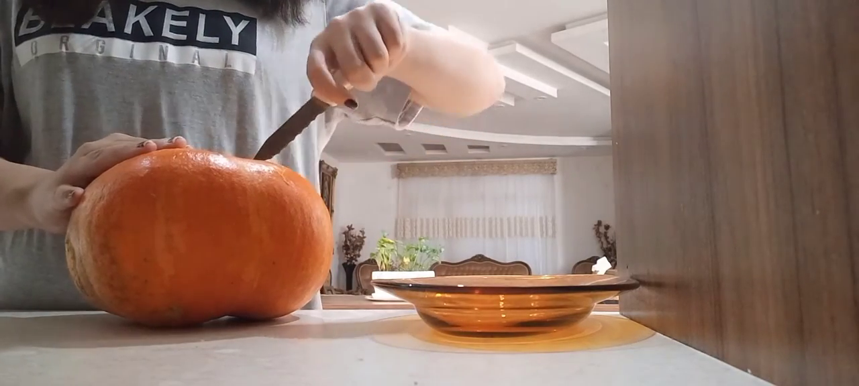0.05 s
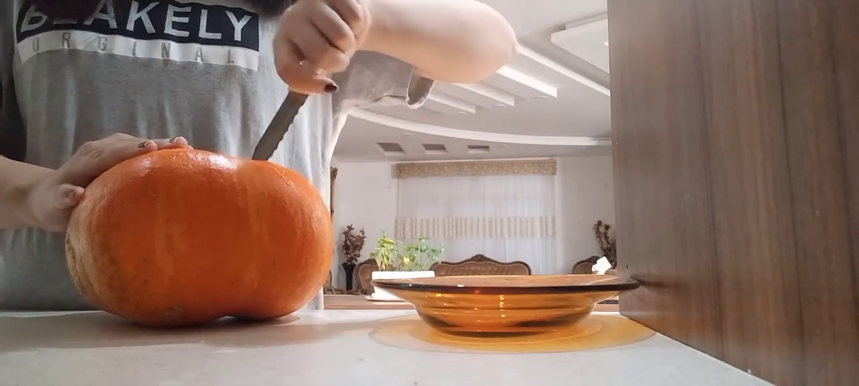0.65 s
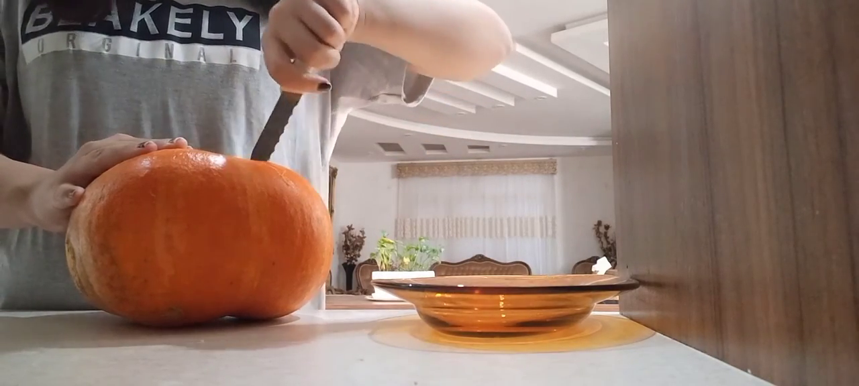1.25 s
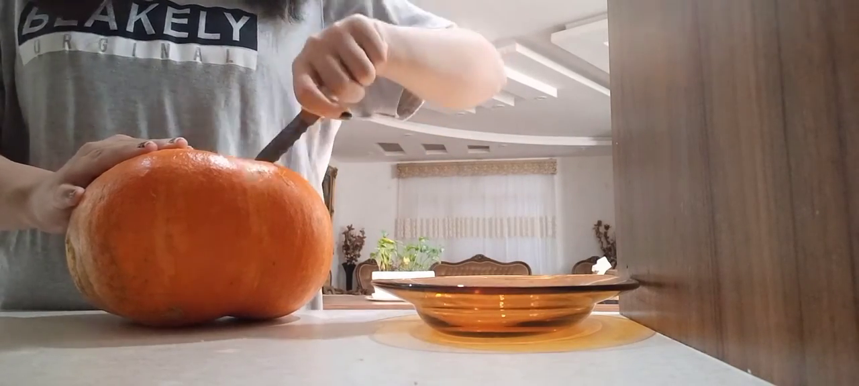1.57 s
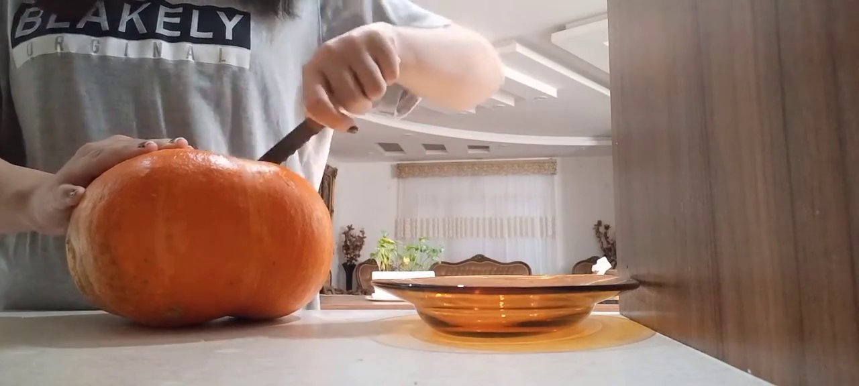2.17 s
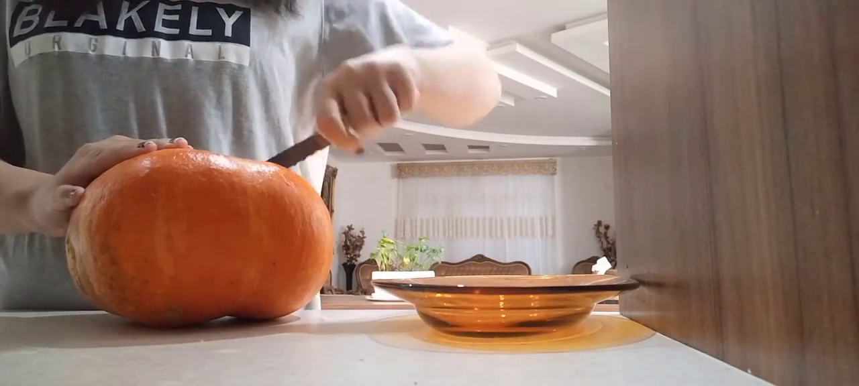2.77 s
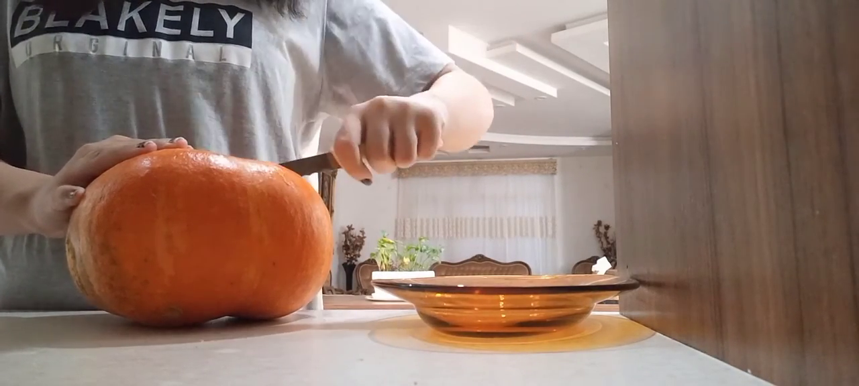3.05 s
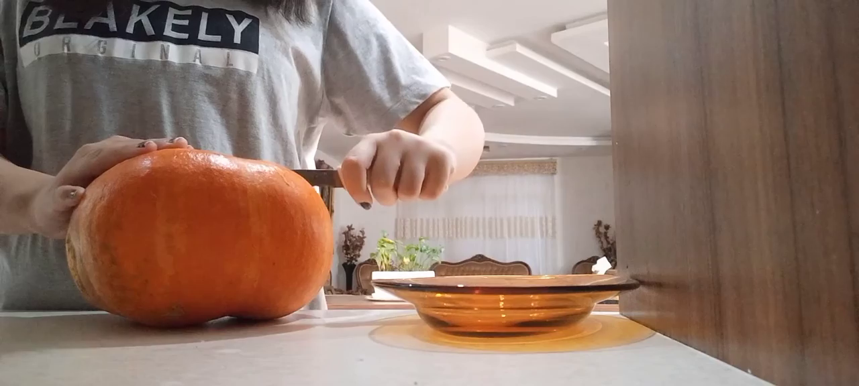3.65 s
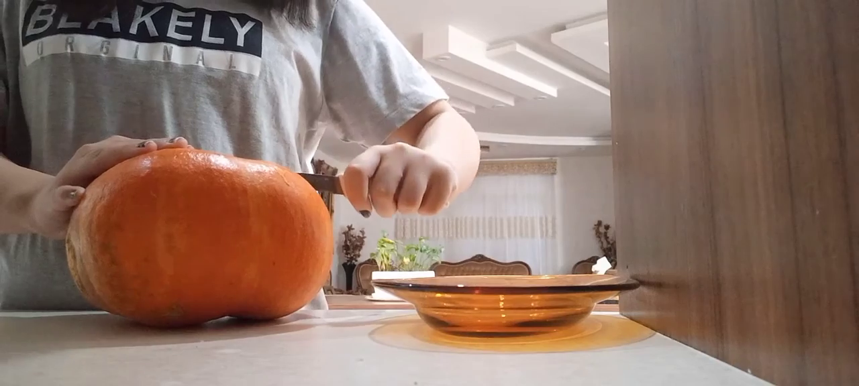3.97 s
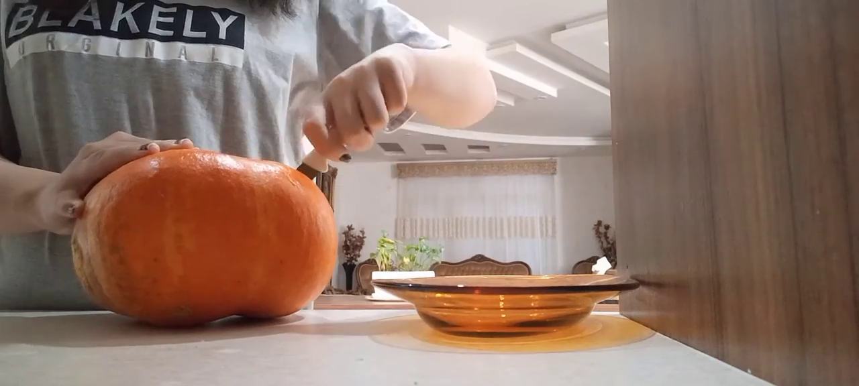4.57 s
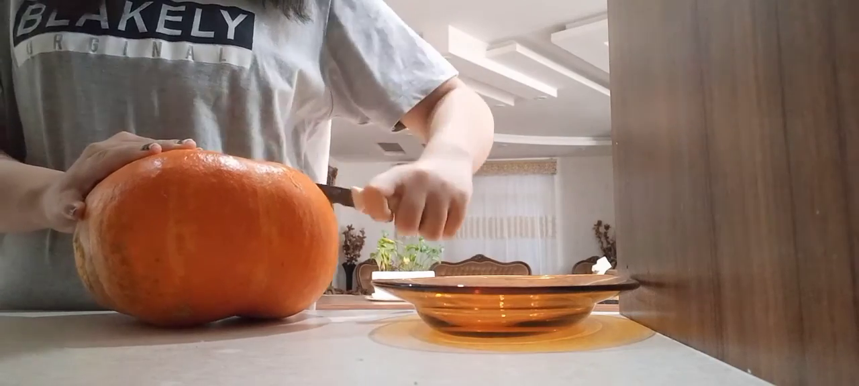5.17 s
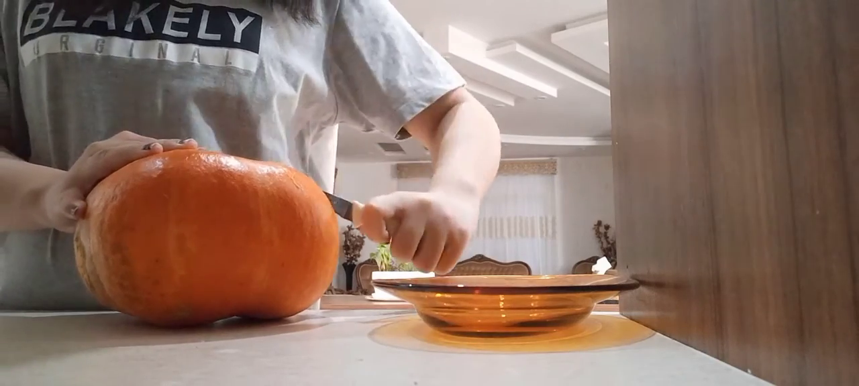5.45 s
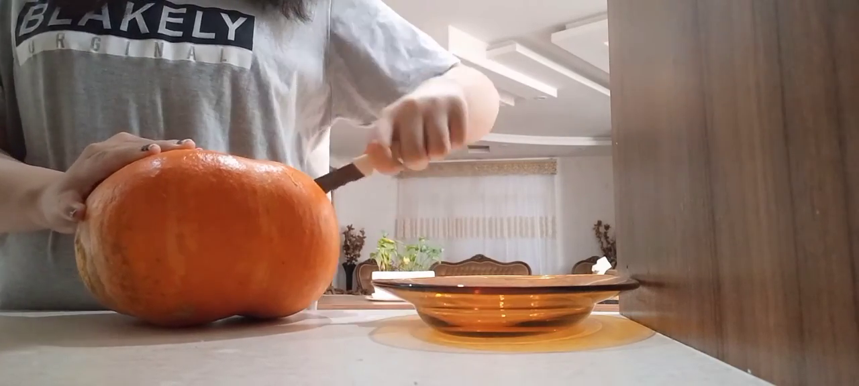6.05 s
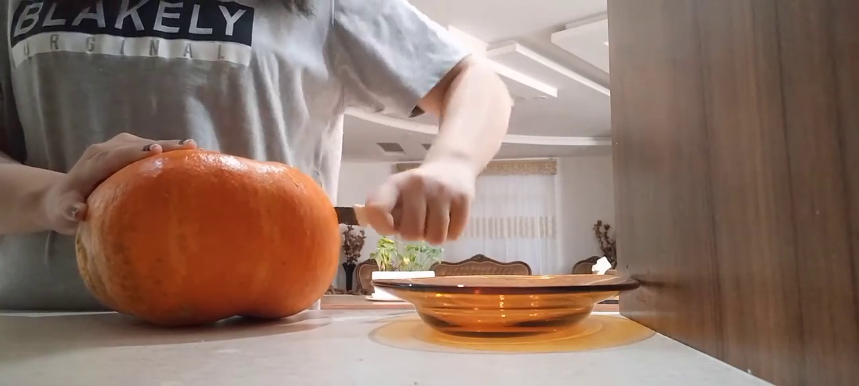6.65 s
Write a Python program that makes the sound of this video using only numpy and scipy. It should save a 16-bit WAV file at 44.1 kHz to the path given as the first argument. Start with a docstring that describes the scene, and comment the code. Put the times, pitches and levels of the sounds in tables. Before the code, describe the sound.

A kitchen knife saws through a raw pumpkin, close and slightly left, in a small, quiet kitchen. From the start, short uneven strokes make the rind croak and crunch, with a thin hiss from the blade and single fibres snapping. Firmer strokes come at about 1.5, 2.1 and 2.8 to 3 seconds, and the wet rind gives one faint, low squeak near 1.9. From 3.2 to 4.1 seconds the fibres part in a run of crisp little clicks. After a softer push, all sound drops out for an instant at 4.5. At 5.1 to 5.4 the blade levers along the cut with the loudest creak and a hollow boom, and the pumpkin rocks on the counter at 5.6. Another crunching, thumping push comes around 6.5, followed by lighter snaps until nearly 7 seconds. A soft rumble and a faint, very high whine lie underneath.

```python
"""A kitchen knife saws through a raw pumpkin on a counter in a small, quiet kitchen. Tearing fibres make the
rind croak near 500 Hz and the thin blade hiss near 6.4 kHz; single fibres snap. When the blade is levered along
the cut, the hollow pumpkin booms and rocks. Wet rind squeaks faintly. A soft rumble and a thin whine lie
underneath, and the whole sound drops out for a moment."""
import sys
import numpy as np
from scipy import signal
from scipy.fft import rfft, irfft
from scipy.io import wavfile
from scipy.ndimage import uniform_filter1d

SR = 44100
rng = np.random.default_rng(int(sys.argv[2]) if len(sys.argv) > 2 else 0)


def dump_mix(stems):
    """Bounce the given channels to the path in sys.argv[1] as a 16-bit WAV at rate SR."""
    frames = np.atleast_2d(stems).T  # one column per channel
    limited = np.clip(frames, -1, 1)  # hard clip at full scale
    pcm = np.round(limited * 32767).astype(np.int16)
    wavfile.write(sys.argv[1], SR, pcm)


N = 305158
TIME = np.arange(N) / SR
RELEASE_S, FIRM_DB = 0.067, -59.5  # fade time of a stroke; level that counts as a firm stroke


def from_db(db):
    """Turn decibels into a gain."""
    return 10 ** (np.asarray(db) / 20)


def rms_one(x):
    """Scale a signal to an average strength (rms) of 1."""
    return x / np.sqrt(np.mean(x ** 2) + 1e-20)


def gain_curve(points):
    """Join (time, dB) points into a gain for every sample."""
    return from_db(np.interp(TIME, *np.transpose(points)))


def drift(rate_hz):
    """A smooth random wander with a spread of about 1."""
    r = np.exp(-40 * np.pi * rate_hz / SR)
    slow = signal.lfilter([1], [1, -2 * r, r * r], rng.standard_normal(N // 20 + 2002))[2000:]
    return np.interp(np.arange(N) / 20, np.arange(len(slow)), rms_one(slow))


def resonate(force, modes, low_hz, high_hz, order=2):
    """A force makes a body ring at its own pitches (modes), in stereo, within a frequency band."""
    click, ring = signal.unit_impulse(SR // 8), 0
    for k, (hz, width, db, pan) in enumerate(modes):
        r = np.exp(-np.pi * width / SR)
        feedback = [1, -2 * r * np.cos(2 * np.pi * hz / SR), r * r]
        mode = signal.lfilter([1, 0, -1], feedback, click) * (1 - r * r) / 2
        ring = ring + (-1) ** k * from_db([[db + pan / 2], [db - pan / 2]]) * mode
    band = signal.butter(order, [low_hz, high_hz], "band", fs=SR, output="sos")
    ring = signal.sosfilt(band, ring + 1e-18)
    ring /= np.sqrt(np.sum(ring ** 2) / 2)
    return signal.oaconvolve(np.atleast_2d(force), ring, axes=1)[:, :N]


def knife_strokes():
    """Strength of croak, crunch and hiss: each stroke swells, holds and dies away."""
    # strokes: (time at full force [s], hold [s], rise [s], rind croak [dB], flesh crunch [dB], hiss [dB])
    strokes = [(0.225, 0.18, 0.027, -57.5, -77, -81), (0.452, 0.08, 0.085, -51, -71.5, -80.5),
               (0.595, 0.056, 0.072, -54, -69, -82.5), (0.94, 0.019, 0.071, -52, -65.5, -74),
               (1.026, 0.013, .04, -63.5, -78, -85.5), (1.153, 0.05, 0.096, -59.5, -74, -81),
               (1.281, 0.035, 0.089, -69, -83.5, -85), (1.458, 0.042, .08, -45, -58, -66.5),
               (1.767, .17, 0.27, -67, -78.5, -80), (2.108, 0.057, 0.11, -49, -58.5, -66.5),
               (2.393, 0.1, 0.057, -66.5, -82.5, -76), (2.766, 0.11, 0.14, -47.5, -59, -66.5),
               (2.897, 0.069, 0.069, -48, -57, -59.5), (2.974, 0.022, .04, -46.5, -56, -57),
               (3.24, 0.027, 0.055, -56.5, -74.5, -66), (3.32, 0.2, 0.052, -63, -76, -78.5),
               (3.54, 0.096, 0.065, -59.5, -68.5, -65.5), (3.707, 0.0096, 0.063, -55.5, -69.5, -67),
               (3.812, 0.033, 0.014, -53.5, -65.5, -67), (3.877, 0.23, .02, -63, -78, -76.5),
               (4.383, 0.12, 0.096, -62, -73.5, -74.5), (4.643, 0.049, 0.04, -71, -95, -100),
               (4.765, 0.023, 0.056, -75, -67.5, -93), (5.138, 0.04, 0.057, -46, -59, -62.5),
               (5.217, 0.11, 0.035, -52, -63, -68), (5.325, 0.029, 0.094, -38, -52.5, -61.5),
               (5.62, 0.027, 0.013, -54, -66.5, -66), (5.702, 0.14, .05, -80, -86.5, -87),
               (6.052, 0.07, 0.11, -67.5, -80, -93), (6.359, .015, .01, -56.5, -76.5, -77),
               (6.483, 0.014, 0.034, -40, -45, -53.5), (6.59, 0.1, 0.023, -56, -69.5, -71.5),
               (6.816, 0.11, 0.14, -60.5, -78, -79.5)]
    creep_db, creep_end_s, ramp_db = [[-79.5], [-88], [-98.5]], 4.25, 20.5
    force = from_db(creep_db) * np.clip((creep_end_s - TIME) / RELEASE_S, 0, 1)  # creep between strokes
    for s, hold, rise, *levels_db in strokes:
        away = np.maximum((s - TIME) / rise, (TIME - s - hold) / RELEASE_S)
        on = away < 4
        swell = from_db(-ramp_db * np.maximum(away[on], 0))
        force[:, on] = np.maximum(force[:, on], from_db(levels_db)[:, None] * swell)
    return force


def cell_bursts(per_s, spread_db, friction, stereo):
    """Tiny cell walls burst at random over smooth friction, each with its own strength at each ear."""
    sizes = from_db(spread_db * np.minimum(rng.exponential(1, N), 4))
    sizes *= rng.random(N) < per_s / SR
    ears = rng.choice([-1, 1], N) + stereo * rng.standard_normal((2, N))
    return rms_one(ears * (rms_one(sizes) + friction))


def cutting():
    """Fibres give way in clumps and shake pumpkin and knife; returns the low and the high sounds."""
    # how each part rings, all as (pitch [Hz], width [Hz], relative level [dB], left minus right [dB])
    hollow_modes = [(75.5, 35, -3, -1.5), (96, 36.6, -0.5, -1), (160, 22, -5, -1), (196.6, 22, -8.5, -0.5),
                    (262.7, 20, -9.5, -0.5)]
    rind_modes = [(313, 33, -11, -6), (441.3, 58.4, -0.5, -3), (500.2, 46.5, 1.5, -3.5), (554, 60, -6, -1),
                  (606, 77, -10, -3)]
    flesh_modes = [(699, 79, 2.5, 7.5), (869, 140, -1, -1), (1025, 82, 0, 4), (1370, 60, -10, -6),
                   (1596, 119, -12.5, -13)]
    top_modes = [(593, 80, 3.5, 1.5), (862, 150, -1, 2), (1042, 85, 1.5, 3.5)]  # the pumpkin's top wall
    knife_modes = [(1343, 40, 8.5, -8.5), (1630, 150, -5.5, 0), (3250, 330, -16, -4), (3650, 730, -5, 4),
                   (4635, 310, 1, -3)]  # the whole knife bending
    blade_modes = [(6030, 580, -4, -6.5), (6470, 590, 2, 5.5), (6790, 380, -5, -7.5)]
    fibre_modes = [(3146, 430, -2, -11.5), (4585, 600, 4, 6.5), (5580, 665, 5.5, -5), (6985, 640, 0, 3.5),
                   (9970, 2140, -1.5, -1), (12550, 1460, 3, 3.5), (14930, 2430, 1, 5)]
    croak, crunch, hiss = knife_strokes()
    tearing = from_db(-62) * (np.sqrt(crunch * hiss) / from_db(FIRM_DB)) ** 1.36  # wet; needs force
    clumps = drift(50)
    coarse = rms_one(from_db(1.72 * clumps)) * cell_bursts(1400, spread_db=2, friction=0.31, stereo=0.31)
    medium = rms_one(from_db(5.7 * clumps)) * cell_bursts(1500, spread_db=2.5, friction=0.4, stereo=0.69)
    fine = rms_one(from_db(3.3 * clumps)) * cell_bursts(4000, spread_db=2, friction=0.36, stereo=1)
    crack, knock = fibre_snaps(croak, hiss)
    hollow = resonate(croak * coarse * from_db(-7.5), hollow_modes, 60, 360)
    rind = resonate(croak * coarse * from_db(-0.5) + knock * from_db(13.5), rind_modes, 250, 800)
    flesh_force = crunch * medium * from_db(-1.47) + knock * from_db(-2.5)
    flesh = resonate(flesh_force, flesh_modes, 600, 1745, order=3)
    knife = resonate(crack * from_db(-4), knife_modes, 1500, 5500)
    blade = resonate(hiss * fine * from_db(-2.5) + crack * from_db(10), blade_modes, 5270, 7400)
    fibres = resonate(tearing * fine + crack * from_db(2), fibre_modes, 1200, 18000)
    # until 3.15 s the knife stands steeply: the top wall rings too and the rubbing blade sings
    steep = np.clip((3.15 - TIME) / RELEASE_S, 0, 1)
    top_force = steep * crunch * cell_bursts(2000, spread_db=1.5, friction=0.5, stereo=0.82)
    top = resonate(top_force, top_modes, 500, 1180, order=3)
    rubbing = steep * from_db(-64.5) * (hiss / from_db(FIRM_DB)) ** 0.71 * rng.standard_normal((2, N))
    singing = resonate(rubbing, [(6390, 210, 0, 1.1)], 5800, 7100)
    return hollow + rind, top + flesh + knife + blade + fibres + singing


def room_tone(alike_below_hz=600):
    """The still room rumbles softly, alike at both ears in the bass, with a thin high whine."""
    # tone colour of the air: (frequency [Hz], relative level [dB])
    air_colour = [(20, -34.5), (32, -17.5), (45, -8), (80, -1.5), (105, -3), (160, -8.5), (300, -12),
                  (480, -22), (680, -26), (1100, -37), (2000, -38.5), (4000, -43), (8000, -48.5),
                  (15000, -39.5)]
    # loudness of the air and of the whine: (time [s], level [dB])
    air_level = [(0, -64.5), (4.2, -64), (4.47, -59), (4.54, -67), (6.0, -68), (6.92, -65.5)]
    whine_level = [(0, -75), (4.47, -76.5), (4.54, -79), (6.2, -83.5), (6.92, -73)]
    # the whine: (pitch [Hz], width [Hz], relative level [dB], left minus right [dB])
    whine_modes = [(15272, 35, 0, 9), (15150, 380, -22, 9)]
    hz = np.maximum(np.arange(N // 2 + 1) * SR / N, 1)
    air_hz, air_db = np.transpose(air_colour)
    colour = from_db(np.interp(np.log(hz), np.log(air_hz), air_db))
    alike = 0.9 / (1 + (hz / alike_below_hz) ** 2)
    mid, side = rfft(rng.standard_normal((2, N)))
    ears = np.sqrt(1 + alike) * mid + np.sqrt(1 - alike) * side * [[1], [-1]]
    air = rms_one(irfft(colour * ears, N))
    whine = resonate(rng.standard_normal(N), whine_modes, 13000, 15700)
    return gain_curve(air_level) * air + gain_curve(whine_level) * whine


def fibre_snaps(croak, hiss, crumble_s=0.0024, crumble=0.22):
    """A snapping fibre knocks the rind and jolts the blade with a click, then crumbles briefly."""
    # thick fibres snapping: (time [s], crack force [dB], knock force [dB])
    thick_snaps = [(0.2175, -56, -50), (0.2746, -66, -51), (0.384, -60, -48), (0.9057, -56.5, -50),
                   (0.9413, -48.5, -39), (1.4457, -48, -45), (1.8997, -52.5, -41.5), (2.1273, -46, -50),
                   (2.15, -48, -61), (2.7908, -47.5, -49), (2.815, -44, -34.5), (2.8717, -45, -48),
                   (3.263, -51, -47.5), (3.3284, -53, -53), (3.4004, -47.5, -51), (3.5118, -47, -53),
                   (3.5523, -43.5, -46), (3.6075, -42.5, -66), (3.635, -46, -63), (3.691, -53, -63),
                   (3.707, -46, -60), (3.7795, -52.5, -53), (3.8072, -40.5, -36), (3.8392, -48.5, -61),
                   (3.8926, -40, -39), (3.9215, -51.5, -51), (3.9569, -49, -59), (4.0822, -49.5, -69),
                   (4.0996, -47.5, -38.5), (4.3124, -82, -48), (5.1337, -45.5, -56), (5.1848, -45.5, -49),
                   (5.2784, -68, -25.5), (5.3238, -45.5, -16.5), (6.356, -57.5, -45.5), (6.473, -45, -39),
                   (6.4864, -48, -42), (6.5901, -42, -41.5), (6.6348, -46.5, -37), (6.6893, -53, -40),
                   (6.8607, -51.5, -41.5)]
    thin_per_s, parted_per_s, spread_db = 8, 30, 1.5
    sizes = from_db(spread_db * rng.standard_normal(N))
    thin = sizes * (rng.random(N) < thin_per_s / SR)
    held_flat = (TIME > 3.3) & (TIME < 4.18)  # the flat blade parts fibres one by one
    parted = sizes * (rng.random(N) < parted_per_s / SR) * held_flat
    crack = thin * hiss * from_db(5.5) + parted * from_db(-56.5)
    knock = (thin + parted) * croak * from_db(-1.5)
    for s, crack_db, knock_db in thick_snaps:
        crack[int(s * SR)], knock[int(s * SR)] = from_db(crack_db), from_db(knock_db)
    fading = signal.lfilter([1], [1, -np.exp(-1 / (crumble_s * SR))], crack + 1e-18)
    return crack + crumble * fading * rng.standard_normal((2, N)), knock


def blade_shoves(wobble=0.5):
    """The stuck blade pushes unevenly: rocking, hollow boom and rind tone build up, then ring out."""
    # pushes: (end [s], length [s], rocking [dB], boom [dB], rind pitch [Hz], rind [dB]); relative levels
    pushes = [(0.299, 0.021, -55, -58, 481.6, -43), (0.367, 0.067, -45, -55, 269, -52.5),
              (0.545, 0.041, -51, -51.5, 482, -41.5), (1.491, 0.065, -44, -44, 496.8, -41.5),
              (1.523, 0.0085, -36.5, -46, 465, -57), (2.992, 0.039, -45.5, -82, 533, -41),
              (3.27, 0.059, -68, -65.5, 320, -54), (4.412, 0.033, -41.5, -54, 510, -69),
              (5.149, .021, -46.5, -53.5, 525, -33.5), (5.269, 0.078, -61, -44, 490, -48),
              (5.332, 0.018, -48, -41.5, 498.1, -22), (5.365, 0.11, -53, -26, 480, -40),
              (5.647, 0.037, -32, -42, 267, -56.5), (6.075, 0.034, -49, -43, 378, -69),
              (6.382, 0.025, -34.5, -43, 480, -50), (6.464, 0.013, -55, -52, 490, -40.5),
              (6.501, 0.023, -35.5, -33, 467.2, -33), (6.545, 0.047, -38, -37, 490, -54),
              (6.648, 0.022, -43, -47, 506, -42)]
    # the rocking slows once the knife levers at the side: (time [s], pitch [Hz])
    rocking_pitch = [(0, 91.2), (4.4, 89), (5.35, 74.6), (6.6, 66.1)]
    sound, t = np.zeros((2, N + SR)), TIME[:SR // 2]
    uneven = wobble * drift(25)[:len(t)]
    for end, length, rock_db, boom_db, rind_hz, rind_db in pushes:
        start = int((end - length) * SR)
        rock_hz = np.interp(end, *np.transpose(rocking_pitch))
        push = np.sin(np.pi * np.minimum(t / length, 1) ** 2)
        # the rocking comes through the counter and reaches the right ear later
        tones = [(rock_hz, rock_db, 0.1, 0.0014), (154, boom_db, 0.21, 0), (rind_hz, rind_db, 0.062, 0)]
        for hz, db, ring_s, lag_s in tones:
            swell = signal.lfilter([1], [1, -from_db(-60 / (ring_s * SR))], push)
            clock = t + start / SR - [[0], [lag_s]]  # overlapping pushes feed the same swing
            swing = np.sqrt(2) * np.sin(2 * np.pi * hz * clock + uneven)
            sound[:, start:start + len(t)] += from_db(db) * swell / swell.max() * swing
    return sound[:, :N]


def rind_squeak(jitter=0.0287):
    """Wet rind sticks and slips on the slowing blade: a faint falling squeak."""
    # course of the squeak: (time [s], pitch [Hz], level [dB])
    glide = [(1.76, 343, -93), (1.82, 340, -74.5), (1.88, 337.8, -62), (1.915, 326.4, -68),
             (1.96, 323, -62), (2.021, 318, -76)]
    # its harmonics, lowest first: (relative level [dB])
    harmonics = [-0.5, -1, -18]
    s, hz, db = np.transpose(glide)
    pitch = np.interp(TIME, s, hz) * (1 + jitter * drift(42))
    phase = 2 * np.pi * np.cumsum(pitch) / SR
    tone = sum(from_db(level) * np.sin(k * phase) for k, level in enumerate(harmonics, 1))
    return tone * np.interp(TIME, s, from_db(db), left=0, right=0)


def from_left(x, lag_s):
    """A sound from the left reaches the right ear a little later."""
    return np.array([x[0], np.interp(TIME - np.round(lag_s * SR) / SR, TIME, x[1])])


def echoes(x, ring_s, delay_s):
    """Dense echoes, different at each ear, that fall by 60 dB in ring_s."""
    t = TIME[:SR // 2]
    tail = rng.standard_normal((2, len(t))) * from_db(-60 * t / ring_s) * (t > delay_s)
    return signal.oaconvolve(x, tail / np.sqrt(np.sum(tail ** 2) / 2), axes=1)[:, :N]


def scene():
    """The pumpkin lies a little to the left; counter and cabinet scatter its sound into the kitchen."""
    low, high = cutting()
    low = low + from_db(-2) * blade_shoves() + rind_squeak()
    direct = from_left(low, lag_s=0.00019) + from_db(-1) * from_left(high, lag_s=0.00042)
    near = echoes(from_db(-9) * high + from_db(-29.5) * low, ring_s=0.088, delay_s=0.0022)
    far = echoes(from_db(-27) * high + from_db(-18) * low, ring_s=0.3, delay_s=0.0069)
    return direct + near + far + room_tone()


def record(dry):
    """The sound drops out once, briefly, and the highest treble is cut."""
    start_s, end_s, dip_db, cutoff_hz = 4.479, 4.529, -32, 15800
    gap = uniform_filter1d(1.0 * ((TIME > start_s) & (TIME < end_s)), size=300)
    low_pass = signal.ellip(10, 0.2, 70, cutoff_hz, fs=SR, output="sos")
    return signal.sosfilt(low_pass, dry * from_db(dip_db * gap))


dry = scene()
out = record(dry)
dump_mix(out)
```